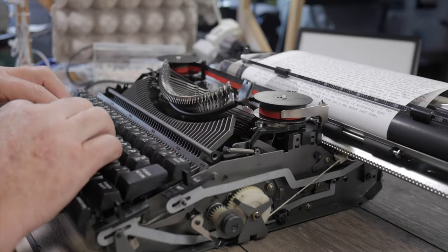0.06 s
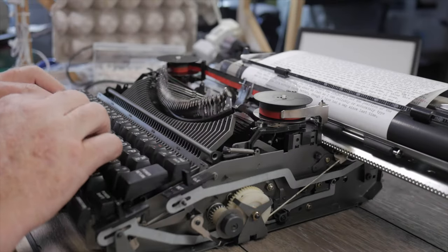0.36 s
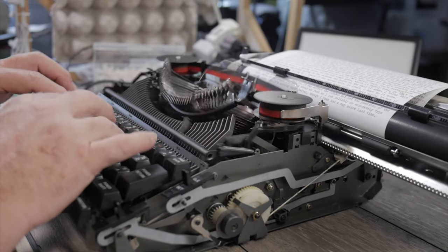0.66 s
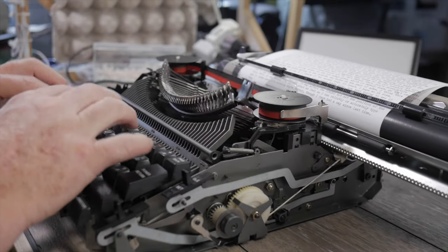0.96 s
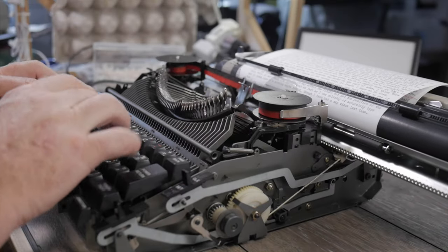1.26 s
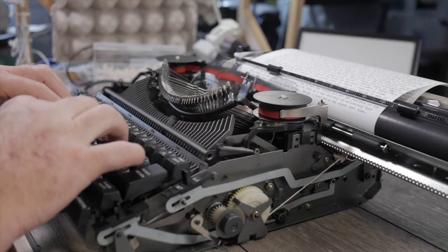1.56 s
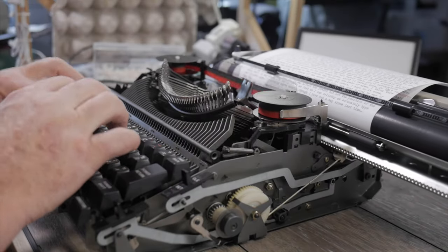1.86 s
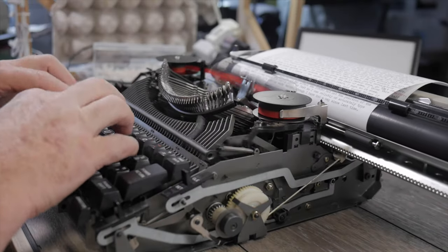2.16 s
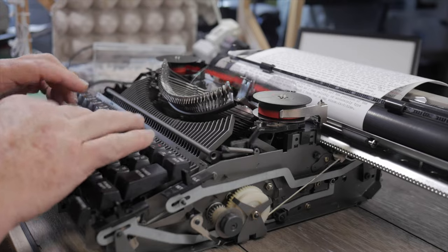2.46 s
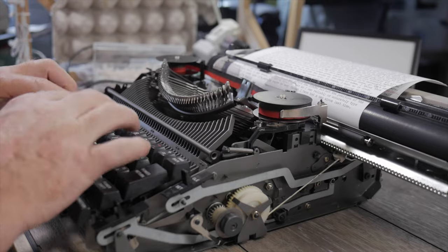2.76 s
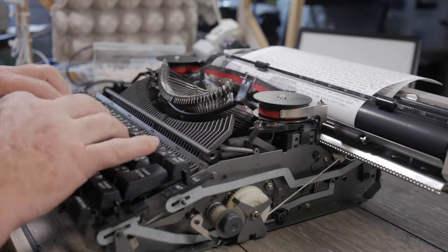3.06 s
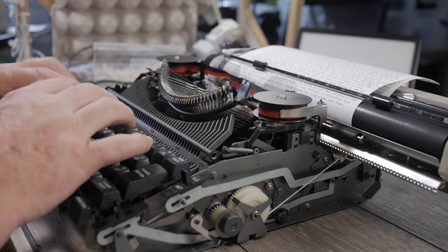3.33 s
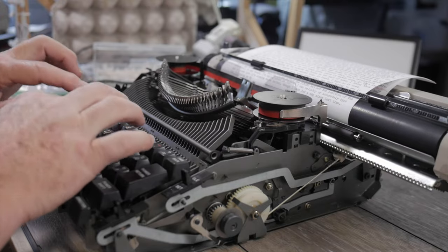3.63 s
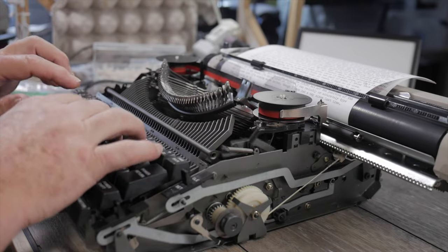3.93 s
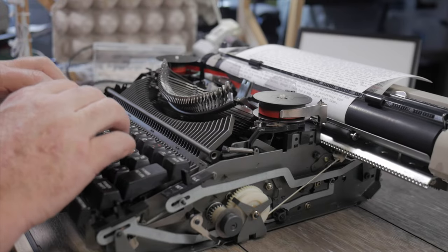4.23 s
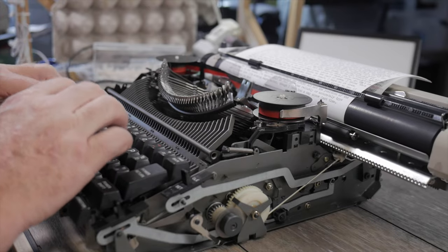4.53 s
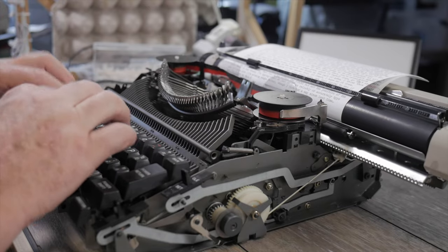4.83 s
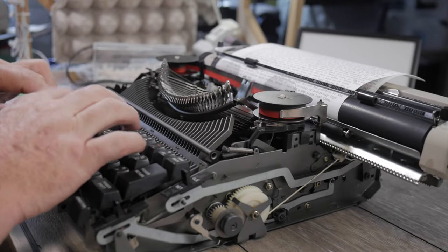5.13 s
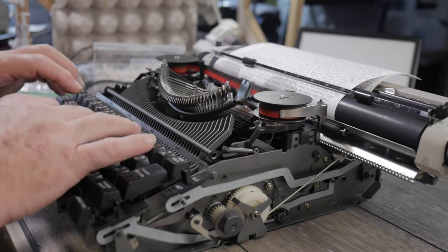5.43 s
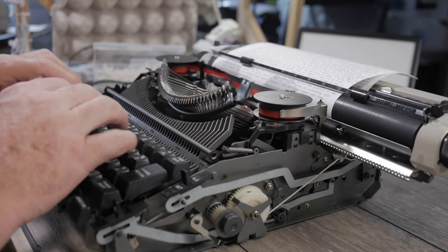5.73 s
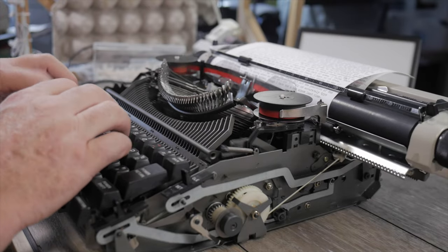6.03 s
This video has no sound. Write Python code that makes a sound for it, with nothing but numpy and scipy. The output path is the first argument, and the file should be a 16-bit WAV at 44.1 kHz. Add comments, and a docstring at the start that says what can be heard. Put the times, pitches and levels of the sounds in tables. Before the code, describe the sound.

Close, irregular typing on an electric typewriter: sharp metallic strikes, rattling linkage and dull bench thumps over a faint hum.

```python
"""A shift clunks, keys tick, then letters crack out in uneven bursts over a faint motor hum: an electric
type-bar typewriter, close by on a wooden bench with its cover off. For each letter a latch trips,
the power roller flings a bar at the platen, the carriage steps and the bar drops back.
Space bar and shift rattle the linkage, the steel frame rings and the bench booms under the blows."""
import sys
import numpy as np
from scipy import signal
from scipy.fft import rfft, irfft
from scipy.io import wavfile

SR = 44100
rng = np.random.default_rng(int(sys.argv[2]) if len(sys.argv) > 2 else 0)


def to_wav(sig):
    """Store sig (one row per channel, or 1-D mono) as 16-bit WAV at the path in sys.argv[1].

    Samples outside -1..1 are clipped; the rate is SR.
    """
    pcm = np.clip(np.atleast_2d(sig), -1, 1) * 32767
    pcm = np.round(pcm).astype(np.int16)
    wavfile.write(sys.argv[1], SR, pcm.T)  # frames by channels


N = 268745
TIME = np.arange(N) / SR


def undb(db):
    """Decibels to gain."""
    return 10 ** (np.asarray(db) / 20)


def unit(x):
    """Scale to an energy of one."""
    return x / np.sqrt(np.sum(x ** 2) + 1e-18)


def add(track, start_s, sound):
    """Mix a sound into a track, trimming what overhangs the scene."""
    i = int(start_s * SR)
    sound, i = sound[max(-i, 0):], max(i, 0)
    track[i:i + len(sound)] += sound[:max(N - i, 0)]


def through(x, response):
    """Pass a sound through an impulse response."""
    return signal.oaconvolve(x, response)[:len(x)]


def colour(curve, size=4096):
    """An EQ curve of (freq_hz, gain_db) points as a minimum-phase response of unit energy."""
    hz, db = np.transpose(curve)
    bins_hz = np.maximum(np.arange(size // 2 + 1) * SR / size, 1)
    gain = undb(np.interp(np.log(bins_hz), np.log(hz), db))
    cepstrum = irfft(np.log(gain))
    cepstrum[1:size // 2] *= 2
    cepstrum[size // 2 + 1:] = 0
    return unit(irfft(np.exp(rfft(cepstrum))))


def fade(t60):
    """Exponential decay that reaches -60 dB after t60 seconds."""
    t = np.arange(int(t60 * SR) + 2) / SR
    return np.exp(-np.log(1000) * t / t60)


def ringing(modes):
    """Half a second of a struck body: one dying sine per mode."""
    t = TIME[:SR // 2]
    ring = 0
    for hz, db, t60 in modes:
        envelope = undb(db) * np.exp(-np.log(1000) * t / t60)
        ring = ring + envelope * np.sin(2 * np.pi * hz * t + rng.uniform(0, 2 * np.pi))
    return unit(ring)


def contact(t60, rise):
    """Metal meeting metal: a noise burst that builds and dies quickly; times in seconds."""
    decay = fade(t60)
    attack = (1 - np.exp(-TIME[:len(decay)] / rise)) ** 2
    return unit(decay * attack * rng.standard_normal(len(decay)))


def chatter(length_s, rate, spread_db, t60):
    """Envelope of loose parts colliding about `rate` times a second, unevenly in time and strength."""
    n = max(int(length_s * SR), 2)
    hits = np.zeros(n)
    slots = np.arange(int(length_s * rate) + 1)
    jitter, strength = rng.random((len(slots), 2)).T
    onsets = ((slots + jitter) / len(slots) * (n - 1)).astype(int)
    hits[onsets] = undb(spread_db * strength) ** 2
    power = np.abs(signal.fftconvolve(hits, fade(t60) ** 2))
    return unit(np.sqrt(power)) * np.sqrt(n)


def resonate(push, modes):
    """Share a push among broad resonances: (pitch_hz, nominal_width_hz, level_db)."""
    out = 0
    for hz, width, db in modes:
        b, a = signal.iirpeak(hz, hz / (1.25 * width), fs=SR)
        out = out + undb(db) * unit(signal.lfilter(b, a, signal.lfilter(b, a, push)))
    return unit(out)


def wash(x, t60):
    """Countless shifting modes: noise that stores the energy of a sound and lets it leak away."""
    decay = fade(t60)
    tail = unit(decay * (1 - np.exp(-TIME[:len(decay)] / .0018)))
    energy = np.abs(through(x ** 2, tail ** 2))
    return np.sqrt(energy) * rng.standard_normal(N)


def follow(cues, parts):
    """Every (start_s, level_db) cue sets off the same parts, their delays and levels relative to it."""
    return [(s + delay, *(db + np.array(levels))) for s, db in cues for delay, *levels in parts]


# hum partials: pitch_hz, level_db
HUM_TONES = [(118.4, -66), (425.3, -75), (597.5, -69.5), (2110, -84.5), (2750, -81.5)]
# whisper of belt and roller: freq_hz, gain_db
BELT_EQ = [(30, -20.5), (80, -11), (130, -4.5), (240, -0.5), (330, -11.5), (440, -6), (520, -13), (620, -7),
           (750, -16.5), (2100, -11.5), (3300, -27), (15000, -37.5)]
def motor():
    """The motor hums with a slight waver while belt and roller turn."""
    out = undb(-59.5) * through(rng.standard_normal(N), colour(BELT_EQ))
    for hz, db in HUM_TONES:
        waver = np.cumsum(rng.standard_normal(N)) * .00028 * np.sqrt(hz)
        out = out + undb(db) * np.sqrt(2) * np.sin(2 * np.pi * hz * TIME + waver)
    return out


# tone of the tail from frame and room: freq_hz, gain_db
FRAME_EQ = [(250, -9.5), (800, -14.5), (1500, -4), (2300, -2), (3300, -6.5), (4400, -2), (5400, -7.5),
            (6200, -1.5), (7200, -3), (8500, -4), (10500, -2), (13000, -8.5), (15500, -12)]
# thin steel parts that sing on: pitch_hz, level_db, t60_s
STEEL_RING = [(2108, -4, .16), (2320, -4, .15), (2587, -4.5, 0.18), (4050, -2, .13), (4560, -1.5, .14),
              (6100, -6.5, .16), (7260, -6, 0.2), (7700, -11, .15), (9400, -11, .16)]
def frame(levers, strikes):
    """The many small parts and the close room keep ringing after every blow."""
    shaken = undb(-4) * levers + undb(-13.5) * strikes
    low, high = (signal.butter(4, 3400, kind, fs=SR, output="sos") for kind in ("low", "high"))
    plates = signal.sosfilt(low, wash(signal.sosfilt(low, shaken), t60=.24))
    springs = signal.sosfilt(high, wash(signal.sosfilt(high, shaken), t60=.195))
    room = through(shaken, contact(t60=.21, rise=.003))
    tail = through(plates + undb(-4) * springs + undb(-6.5) * room, colour(FRAME_EQ))
    steel = through(undb(-18.5) * levers + undb(-26.5) * strikes, ringing(STEEL_RING))
    return tail + steel


# heavy parts landing after each action: delay_s, offset_db
LETTER_THUD = [(.048, -20.5)]
SPACE_THUD = [(.03, -47), (.068, -45)]
SHIFT_THUD = [(.043, -29)]
def thud_cues():
    """The carriage halts after letters and spaces, the basket lands after shifts: (start_s, level_db)."""
    db_per_letter = -.6  # the carriage halts more softly as its spring runs down
    letters = [(s, swing_db + db_per_letter * i) for i, (s, _, swing_db, _) in enumerate(LETTER_CUES)]
    shifts = [(s, db) for s, _, db in SHIFT_CUES]
    return follow(letters, LETTER_THUD) + follow(SPACE_CUES, SPACE_THUD) + follow(shifts, SHIFT_THUD)


# tone of the wood and of a heavy landing: freq_hz, gain_db
WOOD_EQ = [(25, -25), (55, -23), (85, -9), (125, -3), (170, 3.5), (205, -12.5), (285, -1.5), (370, -12.5),
           (600, -11), (1200, -11.5), (3000, -50)]
THUD_EQ = [(30, -21), (55, -13), (85, 3), (160, -1), (260, -8.5), (420, -4.5), (800, -5), (1400, -9),
           (3000, -42.5)]
# modes of the bench top and of the carriage: pitch_hz, level_db, t60_s
BENCH_BOOM = [(168.6, 5.5, 0.49), (278, -0.5, .3)]
CARRIAGE_RING = [(1533, -2, .6), (1775, -9, .3), (2332, -7, .4), (3165, -10.5, .3)]
def bench(force):
    """Blows go through the feet into the bench, which booms on; heavy parts also ring the carriage."""
    knocks, carriage = np.zeros((2, N))
    wood, heavy, ring = colour(WOOD_EQ), colour(THUD_EQ), ringing(CARRIAGE_RING)
    for s, db in thud_cues():
        thud = unit(signal.fftconvolve(contact(t60=.062, rise=.002), heavy))
        add(knocks, s - .002, undb(db + 25) * thud)
        add(carriage, s, undb(db + 17) * ring)
    for s, blow_db, _, _ in LETTER_CUES:
        knock = unit(signal.fftconvolve(contact(t60=.025, rise=.00075), wood))
        add(knocks, s - .001, undb(blow_db - 12) * knock)
    direct = knocks + through(force, wood)
    # the churn of the levers keeps the lowest modes going
    boom = through(wash(direct, t60=.29), ringing(BENCH_BOOM))
    tail = through(wash(direct, t60=.51), wood)
    return direct + carriage + undb(-6) * (boom + tail)


# linkage in motion, relative to its cue: from_s, to_s, clatter_db, jingle_db, rumble_db
KEY_SHAKE = (-.009, .004, -18, -10, -23)
SPACE_SHAKE = (-.046, .088, -43.5, -40.5, -49.5)
SHIFT_SHAKE = (.018, .068, -33.5, -26, -35)
SHIFT_TAIL = (.068, .3, -51, -58, -48)
def rattle_cues():
    """Keys, space and shift shake the linkage: (start_s, end_s, clatter_db, jingle_db, rumble_db)."""
    moves = [(s, db, KEY_SHAKE) for s, db in KEY_CUES]
    moves += [(s, db, SPACE_SHAKE) for s, db in SPACE_CUES]
    moves += [(s, db, part) for s, _, db in SHIFT_CUES for part in (SHIFT_SHAKE, SHIFT_TAIL)]
    return [(s + start, s + end, *(db + np.array(levels))) for s, db, (start, end, *levels) in moves]


# keys touched or pressed, loose links snapping: start_s, level_db
KEY_CUES = [(0.185, -49), (0.207, -48), (0.237, -52), (0.304, -35.5), (0.325, -29), (0.346, -15),
            (0.449, -25), (0.636, -25), (1.027, -30), (1.183, -21.5), (1.585, -29.5), (1.932, -26),
            (2.187, -36), (2.419, -32), (2.936, -39), (3.446, -30), (3.961, -26), (4.311, -57), (4.75, -28),
            (4.879, -31), (5.216, -38), (5.353, -34), (5.997, -37)]
# space bar, cued as the carriage releases: start_s, level_db
SPACE_CUES = [(0.994, 1), (1.813, 0.5), (2.825, -1), (3.29, -0.5), (4.566, 2), (5.916, -4)]
# shift lifting or dropping the type basket: start_s, trip_db, landing_db
SHIFT_CUES = [(-0.03, -25, -3.5), (0.336, -15.5, -0.5), (0.656, -21.5, 0.5), (1.058, -23.5, 0),
              (1.343, -24, -4.5)]
# clacks of each action, relative to its cue: delay_s, clack_db, tick_db
KEY_CLACK = [(0, -10, 0)]
SPACE_CLACKS = [(-.052, -49, -46), (-.028, -32.5, -36), (-.013, -29.5, -34.5), (0, -31.5, -31.5),
                (.033, -30.5, -35), (.064, -32, -37), (.108, -42, -44)]
TRIP_CLACK = [(0, 0, 0)]
LANDING_CLACKS = [(.027, -24, -18.5), (.042, -21.5, -18)]
LATCH_CLACK = [(-.0275, -1.5, 1.5)]
CAM_CLACK = [(-.014, -6, -9)]
def clack_cues():
    """Latches trip, cams grip and pawls catch in every action: (start_s, clack_db, tick_db)."""
    latches = follow([(s, db) for s, _, _, db in LETTER_CUES], LATCH_CLACK)
    cams = follow([(s, db) for s, _, db, _ in LETTER_CUES], CAM_CLACK)
    trips = follow([(s, db) for s, db, _ in SHIFT_CUES], TRIP_CLACK)
    landings = follow([(s, db) for s, _, db in SHIFT_CUES], LANDING_CLACKS)
    spaces, keys = follow(SPACE_CUES, SPACE_CLACKS), follow(KEY_CUES, KEY_CLACK)
    return latches + cams + trips + landings + spaces + keys


def lever_clacks():
    """Each lever slides, catches and sounds a note of its own; gives a dull and a bright force."""
    dull, bright = np.zeros((2, N))
    for s, clack_db, tick_db in clack_cues():
        tap = np.pad(contact(t60=.017, rise=.00061), (0, SR // 20))
        note = resonate(tap, [(rng.uniform(1750, 2550), 90, 0)])
        add(dull, s - .001, undb(clack_db + 21.5) * contact(t60=.021, rise=.0008))
        add(dull, s - .001, undb(clack_db + 5) * note)
        add(bright, s - .001, undb(tick_db + 22.5) * contact(t60=.017, rise=.00084))
        # the harder the stop, the more of it is one dry snap of steel on steel
        add(bright, s + .0005, undb(1.4 * tick_db + 25) * contact(t60=.004, rise=.0002))
        add(bright, s - .005, undb(tick_db + 11.5) * contact(t60=.014, rise=.0024))  # the slide
    return dull, bright


# dull body and bright edge of the levers: freq_hz, gain_db
CLACK_EQ = [(250, -26.5), (500, -21.5), (1100, -17.5), (1450, -4), (1920, 0), (2330, -0.5), (2900, -8),
            (3700, -16), (5000, -30)]
TICK_EQ = [(2000, -17.5), (3300, -8), (4500, -8), (5300, -11), (6200, -6), (7250, -0.5), (8400, -2.5),
           (10200, -1.5), (12500, -11.5), (15500, -13)]
def linkage():
    """Levers clack, swing, fall back and rattle; gives their sound and the force they put on the bench."""
    dull, bright = lever_clacks()
    power = np.zeros((3, N))  # clatter, jingle, rumble

    def shake(start_s, envelope, levels_db):
        for band, db in zip(power, levels_db):
            add(band, start_s, (undb(db) * envelope) ** 2)

    for s, _, swing_db, _ in LETTER_CUES:
        # the cam grips the power roller and throws the bar
        swing = undb(swing_db) * chatter(.016, rate=350, spread_db=5, t60=.014)
        swing *= np.minimum(TIME[:len(swing)] / .0029, 1)
        shake(s - .0175, swing, (-4, -3.5, -18))
        # the ribbon carrier jumps up just ahead of the slug
        add(bright, s - rng.uniform(.0032, .0088), undb(swing_db + 22) * contact(t60=.011, rise=.0012))
        # the escapement lets the carriage step, then the bar falls back on its rest
        shake(s + .0065, chatter(.016, rate=200, spread_db=13, t60=.013), (-42.5, -39.5, -57.5))
        shake(s + .036, chatter(.018, rate=250, spread_db=9, t60=.092), (-35.5, -33.5, -44.5))
    for start, end, clatter_db, jingle_db, rumble_db in rattle_cues():
        rattle = chatter(end - start, rate=140, spread_db=13, t60=.022)
        shake(start, rattle, (clatter_db - 2, jingle_db - 7, rumble_db - 3))
    clatter, jingle, rumble = np.sqrt(power) * rng.standard_normal((3, N))
    levers = through(dull + clatter, colour(CLACK_EQ)) + through(bright + jingle, colour(TICK_EQ))
    return levers, rumble


# knock of the platen: pitch_hz, nominal_width_hz, level_db, loudest_at_letter, half_gain_reach_letters
PLATEN_KNOCK = [(1560, 560, -9, 11, 20), (2000, 400, -10, 0, 9), (2316, 290, -5, 12, 14),
                (2590, 420, 4.5, 18, 13), (3070, 500, -13, 13, 16), (4510, 215, 3.5, 14, 8.2)]
def platen(blow, letter):
    """The struck spot moves along the roller letter by letter; each mode answers most at its own place."""
    # every bar has its own length and loads the roller a little differently
    detunes = 1 + rng.uniform(-.016, .016, len(PLATEN_KNOCK))
    knock = 0
    for (hz, width, db, place, reach), detune in zip(PLATEN_KNOCK, detunes):
        nearness = .5 ** (((letter - place) / reach) ** 2)
        knock = knock + undb(db) * nearness * resonate(blow, [(hz * detune, width, 0)])
    return knock


# bright crack of a type bar: pitch_hz, nominal_width_hz, level_db
BAR_CRACK = [(7516, 440, 9.5), (8124, 900, 13.5), (8730, 900, 7.5), (10700, 1400, 9), (14340, 2500, -1.5)]
# letters, cued as the bar hits the platen; levels are relative: start_s, blow_db, swing_db, latch_db
LETTER_CUES = [(0.5056, -8, -20.5, -18), (0.7265, -8.5, -24, -26), (0.8389, -9, -25.5, -26.5),
               (1.2266, -7, -21, -25), (1.4508, -8.5, -25, -24), (1.6277, -9, -21.5, -25),
               (1.9804, -8, -22, -25), (2.0887, -8, -22, -29.5), (2.2339, -10, -25, -29),
               (2.4805, -10, -23, -29), (2.5571, -12, -23.5, -28), (2.6675, -11, -24, -26),
               (2.9844, -9.5, -22, -26), (3.0961, -9, -26, -29), (3.483, -10, -21, -27.5),
               (3.5577, -11, -28, -31), (4.0136, -9.5, -22.5, -28), (4.1257, -11.5, -24, -26),
               (4.788, -10, -21.5, -26), (4.9346, -12.5, -26, -28), (5.1112, -11.5, -24.5, -28),
               (5.2553, -9.5, -28, -31), (5.4003, -11.5, -27, -31), (5.5457, -11, -25.5, -30),
               (5.6559, -13, -24.5, -30), (6.0448, -11, -22.5, -25.5)]
def type_strikes():
    """Each slug drives ribbon and paper into the platen: the roller knocks, the bar cracks and shivers."""
    out = np.zeros(N)
    for letter, (s, blow_db, _, _) in enumerate(LETTER_CUES):
        blow, shiver = np.zeros((2, SR // 20))
        # one clean blow with a little grit, then a light rebound
        blow[0] = 1
        add(blow, 0, undb(-7) * contact(t60=.004, rise=.0003))
        add(blow, rng.uniform(.006, .0088), undb(-17.5) * contact(t60=.0064, rise=.00022))
        # the bar shivers in its guide
        add(shiver, 0, contact(t60=.004, rise=.0006))
        add(shiver, rng.uniform(.001, .002), undb(-9) * contact(t60=.013, rise=.0003))
        add(shiver, rng.uniform(.0037, .008), undb(-27.5) * contact(t60=.008, rise=.0003))
        add(out, s, undb(blow_db + 22) * resonate(shiver, BAR_CRACK))
        add(out, s, undb(blow_db + 15) * platen(blow, letter))
    return out


# tone of the stereo side channel: freq_hz, gain_db
SIDE_EQ = [(40, -4), (110, -14), (180, -18), (300, -16), (550, -14.5), (1000, -13.5), (2200, -30),
           (3200, -17.5), (4200, -5.5), (5500, -11.5), (7800, -32), (10000, -16), (12500, -5.5),
           (15000, -7.5)]
def spread(x):
    """Nearby surfaces scatter a sound, so that it differs between left and right."""
    lead = SR // 200
    scatter = rfft(contact(t60=.012, rise=.001), SR // 8)
    phase_smear = np.roll(irfft(scatter / np.abs(scatter)), lead)[:SR // 30]
    smeared = through(x, unit(phase_smear))
    return np.roll(through(smeared, colour(SIDE_EQ)), -lead)


# a brief low stereo spread around every blow: freq_hz, gain_db
BLOW_SPREAD_EQ = [(30, -24.5), (100, -4.5), (250, 1.5), (600, -2), (1200, -3.5), (3000, -21), (8000, -41.5)]
def scene():
    """The machine stands straight ahead; its ring and the boom of the bench are wider than its blows."""
    levers, rumble = linkage()
    strikes = type_strikes()
    diffuse = frame(levers, strikes) + motor()
    mid = strikes + levers + diffuse + bench(rumble)
    side = undb(-5.5) * spread(diffuse + undb(-6) * levers + undb(-13.5) * strikes)
    side += undb(-18) * through(strikes, colour(SIDE_EQ))
    # the finest jingle comes from all over the mechanism
    side += undb(-24) * through(wash(diffuse + levers, t60=.012), colour(SIDE_EQ))
    # the broad bench top sounds different to left and right
    side += undb(-11.5) * bench(wash(rumble, t60=.015))
    blow_spread = through(wash(strikes + undb(-2.5) * levers, t60=.016), colour(BLOW_SPREAD_EQ))
    side += undb(-25.5) * blow_spread
    return np.array([mid + side, mid - side])


def record(dry):
    """Soft-clip the sharpest peaks, cut one narrow notch and trim both ends of the spectrum."""
    ceiling, notch_hz, low_cut_hz, high_cut_hz = 1.05, 7840, 55, 15500
    rounded = ceiling * np.tanh(dry / ceiling)
    notched = signal.lfilter(*signal.iirnotch(notch_hz, Q=90, fs=SR), rounded)
    thinned = signal.sosfilt(signal.butter(1, low_cut_hz, "high", fs=SR, output="sos"), notched)
    return signal.sosfilt(signal.ellip(8, .2, 70, high_cut_hz, fs=SR, output="sos"), thinned)


dry = scene()
out = record(dry)
to_wav(out)
```